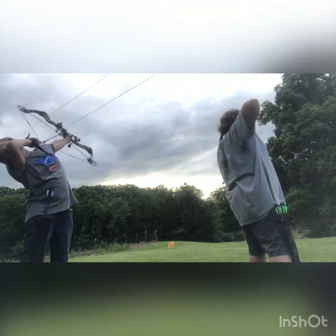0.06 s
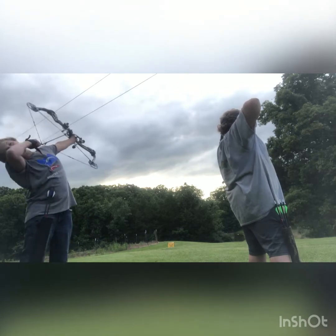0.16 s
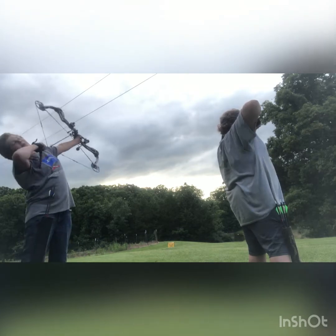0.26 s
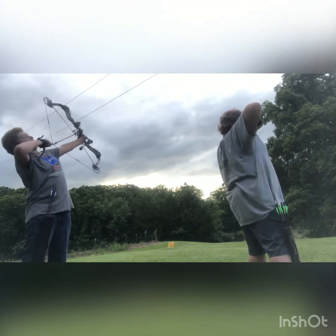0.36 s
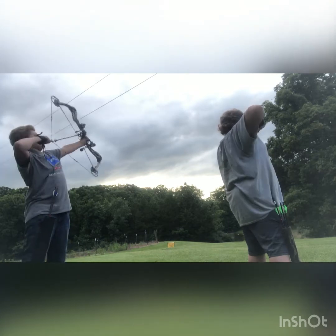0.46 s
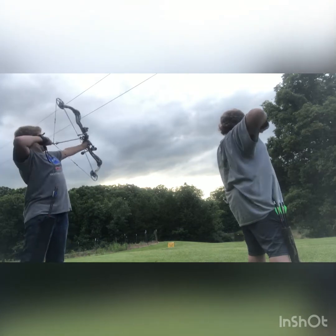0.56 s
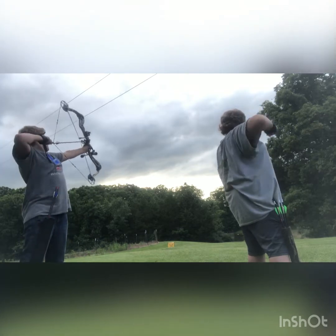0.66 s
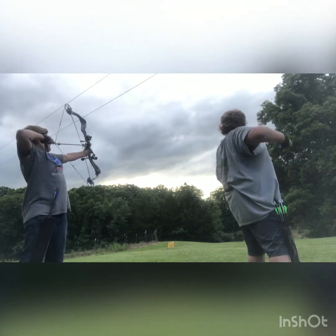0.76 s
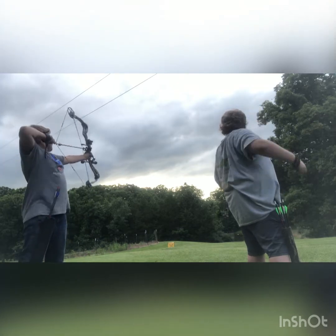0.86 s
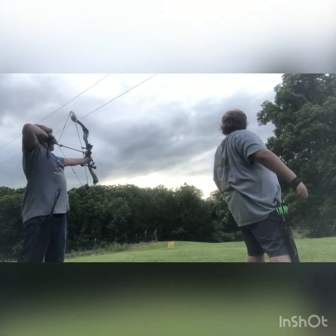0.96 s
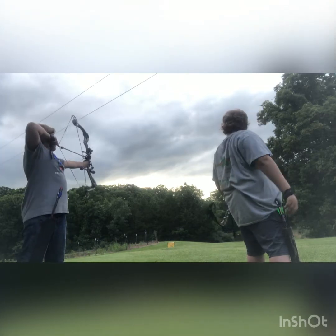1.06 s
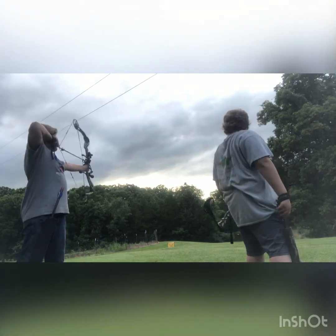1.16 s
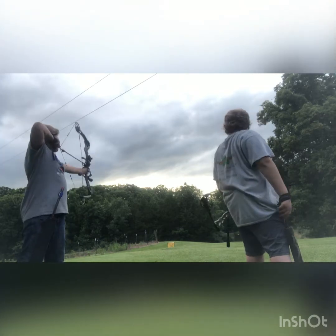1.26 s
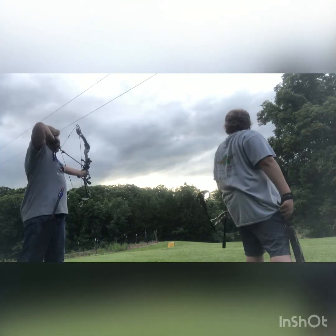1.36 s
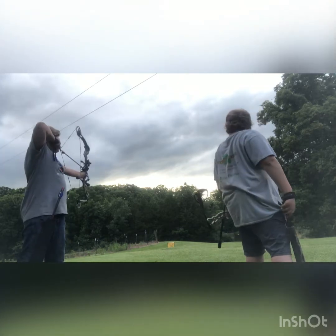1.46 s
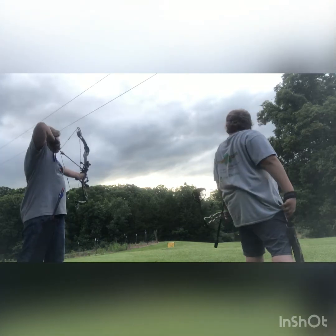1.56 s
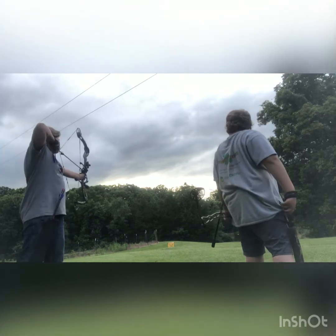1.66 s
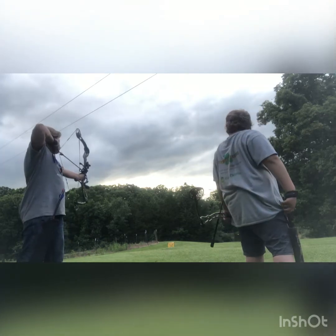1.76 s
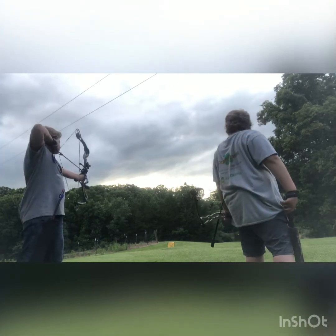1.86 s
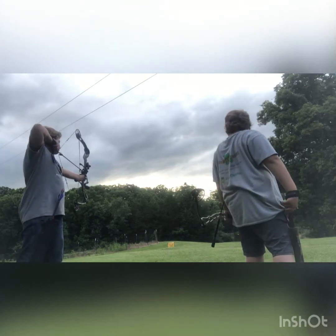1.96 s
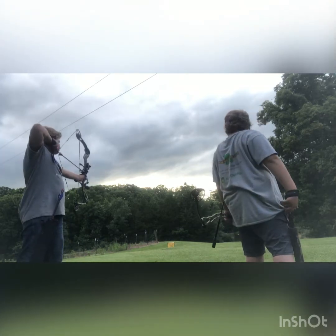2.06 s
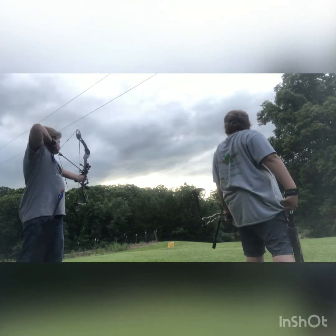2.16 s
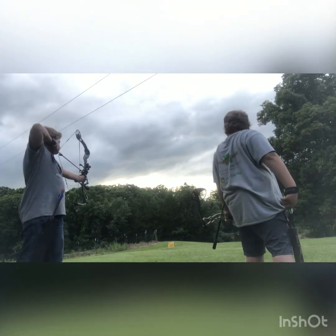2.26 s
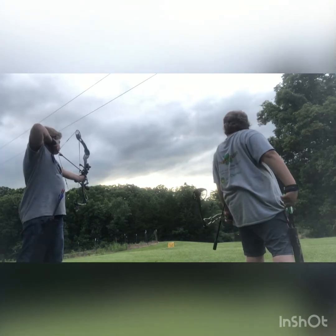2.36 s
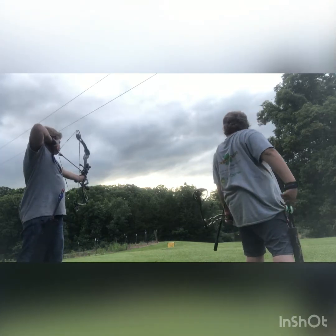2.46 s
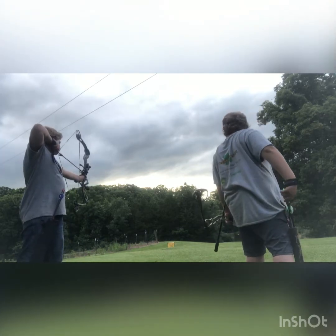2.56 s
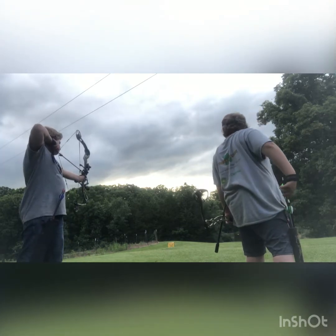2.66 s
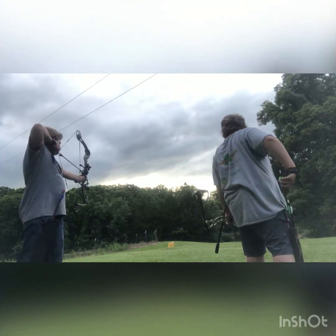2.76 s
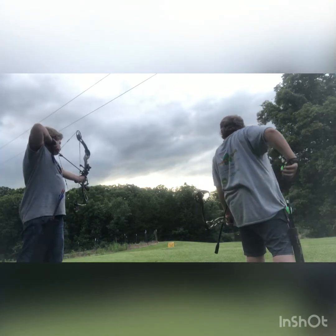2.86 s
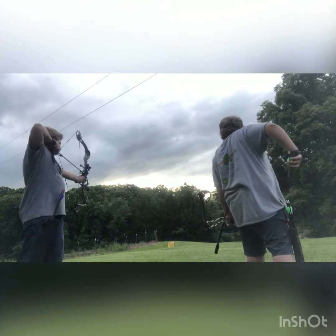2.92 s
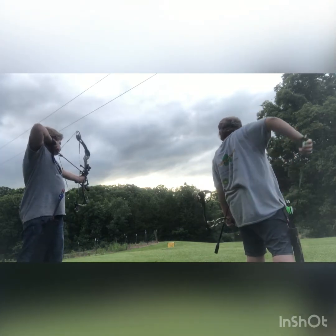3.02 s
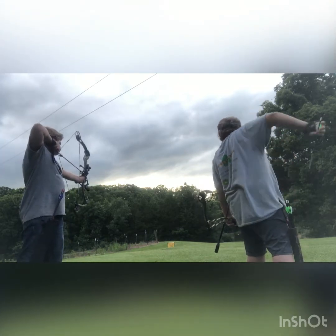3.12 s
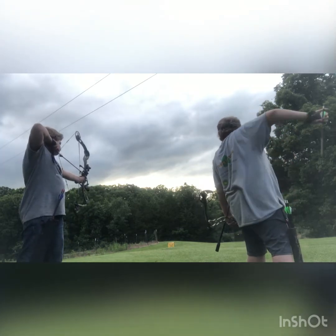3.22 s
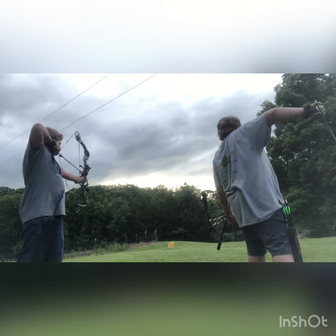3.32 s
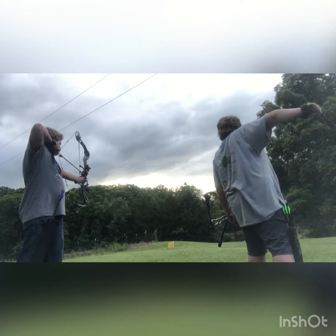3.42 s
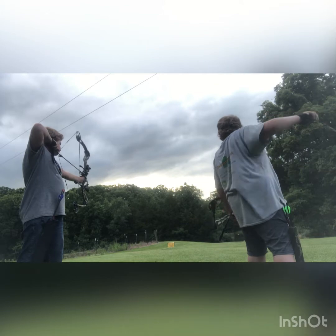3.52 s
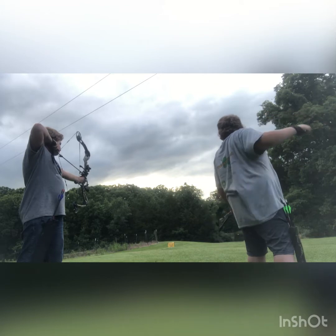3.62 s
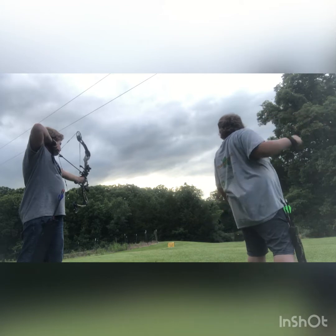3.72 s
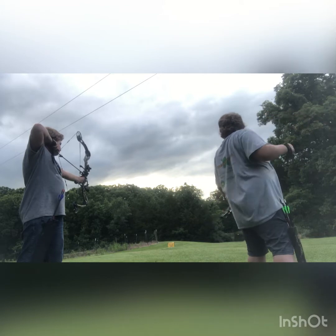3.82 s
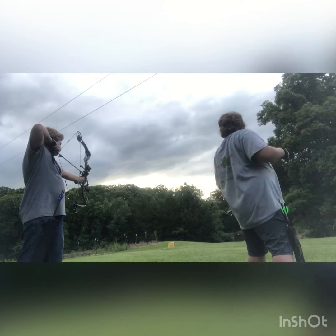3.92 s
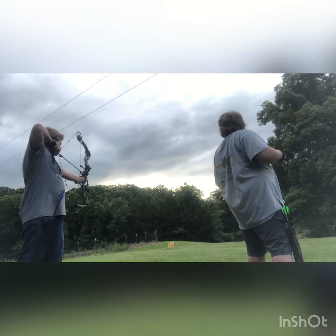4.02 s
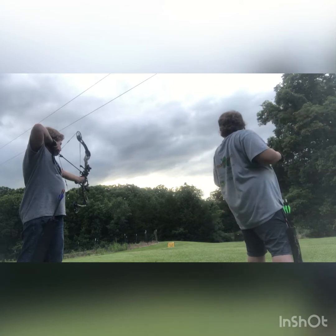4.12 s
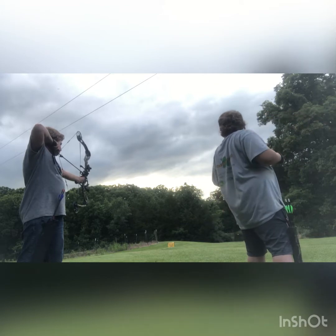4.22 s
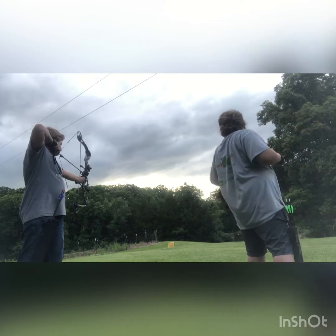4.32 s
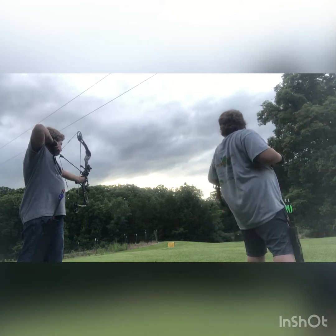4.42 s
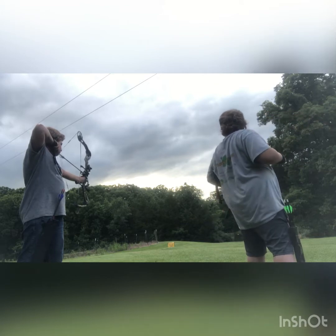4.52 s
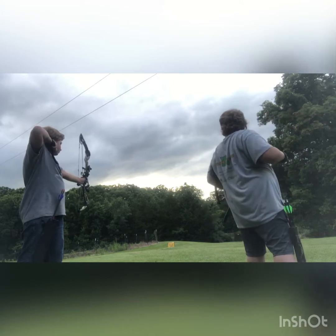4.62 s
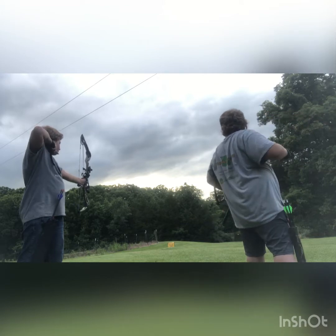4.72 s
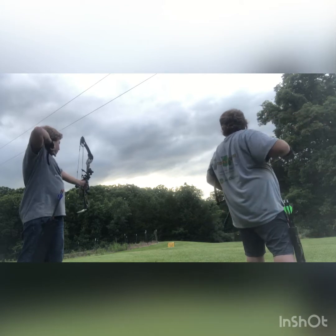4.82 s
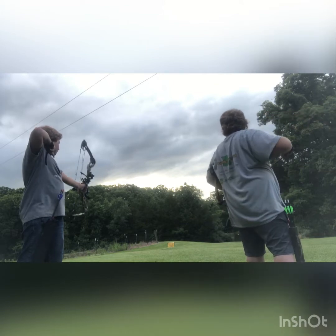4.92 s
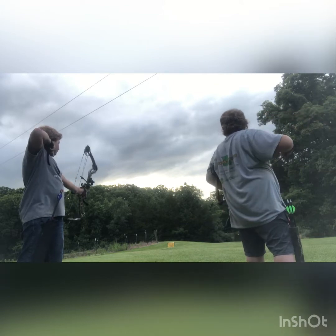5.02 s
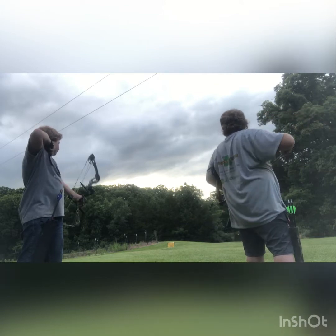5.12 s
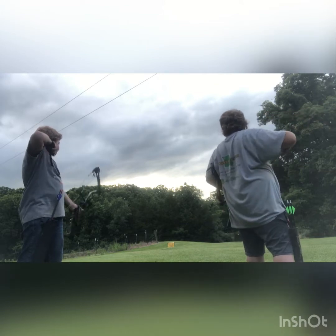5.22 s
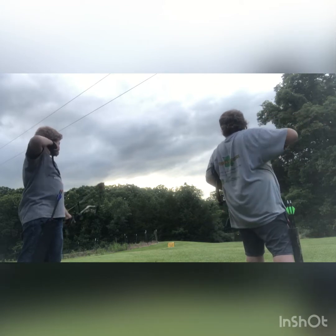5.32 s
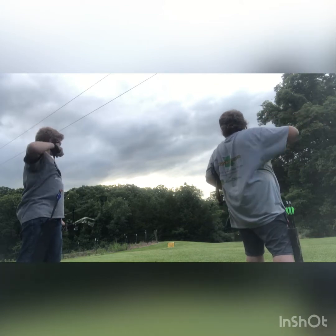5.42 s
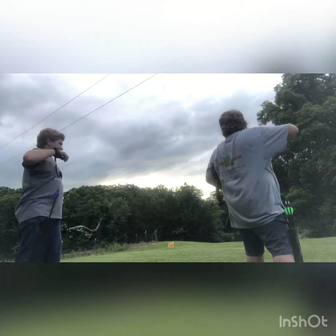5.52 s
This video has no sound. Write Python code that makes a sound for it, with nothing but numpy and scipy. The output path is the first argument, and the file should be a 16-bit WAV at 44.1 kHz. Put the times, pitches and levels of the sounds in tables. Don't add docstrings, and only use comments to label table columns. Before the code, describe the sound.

Almost at once a compound bow releases with a sharp slap and short ring, and a third of a second later its arrow cracks and thuds into a distant target. Clothes rustle, an arrow taps and slides out of a quiver, and a bird whistles faintly. Near the end a second bow snaps, with a stronger target thud. Open grassy field with tree-line echoes, low rumble and insect hiss, picked up by a phone-like microphone near the archers.

```python
import sys
import numpy as np
from scipy import signal
from scipy.fft import rfft, irfft, next_fast_len
from scipy.io import wavfile
from scipy.ndimage import uniform_filter1d, map_coordinates

SR = 44100
rng = np.random.default_rng(int(sys.argv[2]) if len(sys.argv) > 2 else 0)


def undo_db(level):
    steps = np.asarray(level, float) / 20
    return 10 ** steps


def persist_wave(psi):
    counts = np.round(np.clip(psi, -1, 1) * 32767).astype(np.int16)
    wavfile.write(sys.argv[1], SR, np.atleast_2d(counts).T)


N = 246078
T = np.arange(N) / SR

# frequency in Hz, level in dB per Hz.
CLOTH = [(400, -24), (900, -3), (2500, 2.5), (4000, -4.5), (5300, -1), (8000, -13.5), (12000, -23),
         (16000, -30)]


def unit(x):
    return x / np.sqrt(np.mean(x ** 2) + 1e-20)


def along(points, hz):
    f, v = np.transpose(points)
    return np.interp(np.log(hz + 1), np.log(f + 1), v)


def curves(rows):
    s, *cols = np.transpose(rows)
    gate = np.clip(np.minimum(T - s[0], s[-1] - T) / 0.0057, 0, 1)
    return [np.interp(T, s, c) for c in cols] + [gate]


def wobble(rate_hz):
    knots = rng.standard_normal(int(N * rate_hz / SR) + 4)
    return map_coordinates(knots, [T * rate_hz])


def filtered(x, response):
    m = next_fast_len(len(x) + 8192)
    return irfft(rfft(x, m) * response(np.fft.rfftfreq(m, 1 / SR)), m)[:len(x)]


def noise(spectrum, size=N):
    return unit(filtered(rng.standard_normal(size), lambda hz: undo_db(along(spectrum, hz))))


def patchy(x, patchy_db):
    z = signal.stft(x, nperseg=256)[2]
    patches = uniform_filter1d(rng.standard_normal(z.shape), size=5, axis=0)
    patches = uniform_filter1d(patches, size=4, axis=1)
    return unit(signal.istft(z * undo_db(patchy_db * unit(patches)), nperseg=256)[1][:len(x)])


def resonant(peaks):
    def response(f):
        total = 0
        for k, (hz, width_hz, db) in enumerate(peaks):
            damping = 1j * f * width_hz
            total = total + (-1) ** k * undo_db(db) * damping / (hz * hz - f * f + damping)
        return total
    return response


def ring(modes, t, scatter_db):
    return sum(undo_db(db + scatter_db * rng.normal() - 60 * t / t60_s) * np.sin(2 * np.pi * hz * t)
               for hz, db, t60_s in modes)


def swell(t, s, db, attack_s, hold_s, release_s):
    outside = np.maximum((s - t) / attack_s, (t - s - hold_s) / release_s)
    return undo_db(db - 20 * np.maximum(outside, 0))


def swells(t, rows):
    return np.sqrt(sum(swell(t, *row) ** 2 for row in rows))


def puff(s, db, hz, length_s, rough):
    t = np.arange(round(length_s * SR)) / SR
    grain = 1 + rough * unit(uniform_filter1d(rng.standard_normal(len(t)), size=40))
    return s - length_s / 2, undo_db(db) * np.sin(np.pi * t / length_s) ** 2 * grain * np.sin(2 * np.pi * hz * t)


def add(track, s, x):
    part = track[round(s * SR):][:len(x)]
    part += x[:len(part)]


def buzz():
    # frequency in Hz, level in dB.
    click_colour = [(1500, -112), (2500, -97), (5000, -94), (6500, -91), (7800, -93), (8400, -99),
                    (12000, -106), (16000, -114)]
    buzz_hz, on_cycle, off_cycle = 110.4336, .764, .084
    order = np.arange(14, 144)[:, None]
    cycle = np.arange(4097) / 4096
    clicks = np.cos(2 * np.pi * order * (cycle - on_cycle)) - np.cos(2 * np.pi * order * (cycle - off_cycle))
    wave = undo_db(along(click_colour, order[:, 0] * buzz_hz)) @ clicks
    return np.interp(buzz_hz * T % 1, cycle, wave)


def field():
    # time in seconds, strength in dB.
    breeze = [(0, 3), (.5, .5), (.9, 0), (1.5, 1.5), (1.75, -1), (2.6, .5), (3.2, 0), (3.5, -1.5),
              (5.58, -1.5)]
    # frequency in Hz, level in dB per Hz.
    rumble_colour = [(15, -55), (25, -30), (36, -12), (81, -1), (189, -4.5), (267, -11.5), (299, -13),
                     (406, -21), (430, -26.5), (700, -26.5), (910, -58), (1540, -120)]
    # frequency in Hz, level in dB per Hz.
    hiss_colour = [(250, -17), (450, -2), (900, -7), (2000, -11.5), (4500, -14), (5400, -12), (6000, -12.5),
                   (7800, -18.5), (8300, -20), (12000, -22), (16000, -25.5)]
    # time in seconds, level in dB, attack, hold and release in seconds.
    motor_pass = (1.2, -71.5, .6, .75, .6)
    air_db, _ = curves(breeze)
    motor_hz = 295 + 1.5 * wobble(5)
    motor = swell(T, *motor_pass) * undo_db(2.5 * wobble(8.2)) * np.sin(2 * np.pi * np.cumsum(motor_hz) / SR)
    rumble = undo_db(-61.2 + .4 * air_db + 1.4 * wobble(7)) * noise(rumble_colour)
    hiss = undo_db(-69 + air_db + .6 * wobble(5.9)) * noise(hiss_colour)
    return rumble + hiss + motor


def wind():
    # centre in seconds, peak in dB, frequency in Hz, length in seconds.
    pushes = [(0.056, -51, 62, .07), (0.431, -53, 75, .1), (.56, -58, 45, .1), (1.2, -62, 60, .08)]
    out = np.zeros(N)
    for push in pushes:
        add(out, *puff(*push, rough=0))
    return out


def bird():
    # time in seconds, pitch in Hz, level in dB.
    song = [
        [(2.095, 3855, -73), (2.133, 3815, -70), (2.18, 3765, -69), (2.225, 3760, -68), (2.245, 3705, -68),
         (2.27, 3740, -68), (2.321, 3700, -68), (2.335, 3690, -76)],
        [(2.465, 3226, -70), (2.493, 3268, -66), (2.513, 3190, -66), (2.527, 3300, -65), (2.553, 3320, -64),
         (2.585, 3260, -65)],
        [(2.665, 3263, -63), (2.697, 3379, -64), (2.757, 3393, -64), (2.765, 3348, -73)],
        [(2.92, 3245, -69), (2.94, 3240, -66), (2.968, 3310, -65), (3.0, 3290, -64), (3.009, 3273, -68)],
        [(3.006, 3000, -64), (3.012, 2650, -59), (3.017, 2900, -60), (3.022, 3400, -66), (3.032, 2850, -69)],
        [(3.103, 3276, -71), (3.125, 3320, -64), (3.165, 3500, -63), (3.23, 3610, -61), (3.255, 3530, -63),
         (3.275, 3560, -64), (3.3, 3535, -72)],
        [(3.3, 3554, -78), (3.366, 3575, -79), (3.392, 3587, -84), (3.44, 3540, -83)],
    ]
    # centre in
    # seconds, peak in dB, frequency in Hz, length in # seconds.
    chips = [(2.117, -68, 5650, .04), (2.352, -71, 3750, .025), (2.378, -72, 3270, .02),
             (2.405, -74, 3190, .03), (3.66, -73.5, 5600, .08), (3.698, -74, 5280, .06),
             (3.768, -75, 5600, .08), (2.515, -60.5, 4900, .03), (5.2365, -49, 6200, .006),
             (1.459, -56, 5250, .01), (1.1553, -44, 6400, .004), (1.64, -64, 5190, .04),
             (2.59, -58, 3500, 0.01), (2.668, -60, 3270, 0.017), (2.588, -61, 3850, 0.014),
             (2.596, -62, 3100, .016), (4.7, -56.5, 3500, .05), (5.203, -61, 5000, .015),
             (5.272, -56, 3400, .015), (5.354, -52, 3300, .009), (5.4, -61, 2390, 0.016),
             (5.432, -54.5, 3080, 0.011), (5.513, -59.5, 2770, .009)]
    out, t = np.zeros(N), np.arange(SR // 8) / SR
    waver_db, waver_hz = 1.8 * wobble(50), 18 * wobble(60)
    for note in song:
        hz, db, gate = curves(note)
        out += gate * undo_db(db + 2.5 + waver_db) * np.sin(2 * np.pi * np.cumsum(hz + waver_hz) / SR)
    for chip in chips:
        add(out, *puff(*chip, rough=0.55))
    tail = rng.standard_normal(len(t)) * undo_db(-60 * t / 0.19)
    return out + undo_db(-9) * signal.fftconvolve(out, tail / np.linalg.norm(tail))[:N]


def clothes():
    # time in seconds, level in dB, attack, hold and release in seconds.
    rubs = [(.82, -67.5, .13, .005, .14), (1.097, -59, .01, .045, .06), (1.16, -61, .04, .045, .055),
            (1.32, -70, .15, .08, .15), (1.52, -65.5, .12, .005, .18), (1.65, -69, .15, .005, .13),
            (5.23, -68, .35, .04, .4)]
    return swells(T, rubs) * undo_db(2.2 * wobble(40) + 2.9 * wobble(200)) * noise(CLOTH)


def ticks():
    # start in seconds, peak in dB, centre in Hz, treble in dB.
    tick_rows = [(.1165, -42, 5000, -20), (.1405, -24, 6800, -30), (.1562, -36, 9000, -3),
                 (.1735, -42, 7800, -8), (4.5625, -20, 6500, -8), (4.5795, -32, 10300, -10),
                 (4.9325, -50, 2700, -14), (1.0952, -42, 2500, -20), (1.1095, -42, 2100, -25),
                 (1.128, -41, 2000, -25), (1.2025, -50, 4800, -20), (1.219, -52, 3500, -10),
                 (2.33, -62, 5400, -4), (2.355, -64, 10500, -10), (2.387, -63, 6000, -4),
                 (0.9877, -54, 3980, -16), (1.0965, -29.5, 5340, -8), (1.1032, -36, 2400, -16),
                 (1.1139, -27.5, 6120, -16), (1.1232, -33.5, 3330, -18), (1.1337, -33, 3030, -24),
                 (1.1538, -41, 4500, -11), (1.1787, -25.5, 5000, -15), (1.1854, -46, 4840, -19),
                 (1.2115, -48, 2210, -18), (1.2286, -48, 2460, -22), (1.3362, -42, 2940, -25),
                 (1.457, -48, 5160, -28), (1.554, -38.5, 3200, -28), (1.6474, -55, 5110, -17),
                 (1.8343, -42, 3500, -22), (1.911, -40, 4960, -24), (1.9814, -54, 2360, -26),
                 (2.584, -51, 3420, -40), (2.823, -50, 3030, -25), (3.0106, -59, 2790, -27),
                 (1.0985, -36, 8300, -30), (1.2125, -52, 6000, -14), (2.707, -52, 2450, -25),
                 (2.76, -58, 8500, -10), (3.0864, -50, 1620, -21), (3.4191, -59, 3540, -8),
                 (3.469, -52, 3200, -2), (4.9957, -38.5, 1810, -22), (5.1379, -52, 2240, -24),
                 (5.2344, -41.5, 2600, -10), (5.3043, -47, 2200, -26), (5.43, -50, 2900, -20),
                 (2.372, -58, 2000, -30)]
    out, t = np.zeros(N), np.arange(SR // 8) / SR
    for s, db, hz, treble_db in tick_rows:
        t60_s = .024 + .0033 * hz / 1000
        width_hz = max(.8 + .015 * treble_db, .03) * hz
        peaks = resonant([(hz, width_hz, 0), (9500, 3500, treble_db + 1), (1800, 1200, -9)])
        colour = lambda f: peaks(f) / (1 + 1j * f / 11000) ** 2
        decay = undo_db(-60 * t / t60_s) + 1.4 * undo_db(-60 * t / 0.0068)
        burst = (1 - np.exp(-t / 0.00036)) * rng.standard_normal(len(t)) * decay
        add(out, s, undo_db(db - 5.5) * filtered(burst, colour) * np.sqrt(8000 / width_hz))
    return out


def shaft_taps():
    # start in seconds, then peak, low, bright and tube levels in dB.
    taps = [
        (2.147, -25.5, -0.5, -8, -5),
        (2.189, -33, 1.5, -9, -5.5),
        (2.217, -36.5, 2, -14, -8),
        (2.234, -42, 2, -14, -10),
    ]
    # frequency in Hz, level in dB, t60 in seconds.
    shaft_modes = [(620, -14, .03), (890, -7, 0.045), (1100, -8, 0.04), (1257, -4, 0.045), (1480, 8, .014),
                   (1620, 1, 0.032), (2020, -16, .03), (2300, -5, .016), (3150, -5, 0.014), (4000, -8, .01),
                   (4590, 0, 0.016), (6400, -5, .01), (8040, -19, 0.023)]
    # frequency in Hz, level in dB, t60 in seconds.
    tube_modes = [(174, -1, 0.58), (420, -6, 0.047)]
    # frequency in Hz, level in dB per Hz.
    dull_colour = [(500, -30), (800, 4), (1700, 6.5), (2600, -39)]
    shaft_lag_s = .0012
    out, t = np.zeros(N), np.arange(SR // 2) / SR
    for s, db, low_db, bright_db, tube_db in taps:
        modes = [(hz, level_db + bright_db * (hz > 2600) + low_db * (hz < 1400), t60_s)
                 for hz, level_db, t60_s in shaft_modes]
        bright = undo_db(bright_db + 1) * noise(CLOTH, size=len(t))
        dull = undo_db(low_db - 8) * noise(dull_colour, size=len(t))
        shaft = (1 - np.exp(-t / .001)) * ring(modes, t, scatter_db=1.5)
        tube = undo_db(tube_db - 8) * ring(tube_modes, t, scatter_db=0)
        add(out, s, undo_db(db - 9) * undo_db(-60 * t / 0.02) * (bright + dull))
        add(out, s + shaft_lag_s, undo_db(db - 9) * (shaft + tube))
    return out


def snaps():
    # start in seconds, level in dB, t60 in seconds.
    clicks = [
        (3.0674, -38.5, .012),
        (3.0718, -41, .022),
        (3.087, -60, .03),
        (.1562, -37, .008),
    ]
    # frequency in Hz, level in dB per Hz.
    snap_colour = [(900, -30), (2000, -8), (5500, 0), (9000, -7), (14000, -10), (16000, -18)]
    out, t = np.zeros(N), np.arange(SR // 2) / SR
    for s, db, t60_s in clicks:
        add(out, s, undo_db(db - 60 * t / t60_s) * noise(snap_colour, size=len(t)))
    return out


def nock_raps():
    # start in seconds, level in dB.
    groups = [
        [(2.4492, -35.5), (2.4585, -52)],
        [(3.0675, -55), (3.0718, -44.5), (3.0745, -48), (3.087, -60)],
    ]
    # frequency in Hz, level in dB, t60 in seconds.
    nock_modes = [
        [(829, -15, .05), (1250, -16, .04), (1650, -3, .045), (1760, -5, .035), (1900, -2, .014),
         (2090, -8, .025), (2390, -4, .03), (3160, -9, .025), (3950, -12, .015), (4640, -4, .02),
         (5240, -10, .025), (6180, -20, .05), (7950, -18, .04)],
        [(1135, -10, .065), (1620, -8, .07), (1767, -9, .04), (2280, -7, .04), (2885, -7, .05), (3560, -5, .04),
         (3790, -8, .03), (4250, -9, .025), (4800, -1, .025), (5050, -8, .05), (5570, 0, .02), (6480, 0, .018),
         (7950, -14, .06), (8430, -6, .015)],
    ]
    out, t = np.zeros(N), np.arange(SR // 2) / SR
    for raps, modes in zip(groups, nock_modes):
        for s, db in raps:
            body = (1 - np.exp(-t / .0002)) * ring(modes, t, scatter_db=1.5)
            spray = .4 * undo_db(-60 * t / .02) * noise(CLOTH, size=len(t))
            add(out, s, undo_db(db) * (body + spray))
    return out


def slide():
    # time in seconds, level in dB.
    pull_rows = [(2.49, -80), (2.51, -67), (2.63, -68), (2.71, -59.5), (2.745, -56), (2.77, -61),
                 (2.86, -64.5), (2.91, -59), (2.95, -64)]
    # time in seconds, level in dB, attack, hold and release in seconds.
    catches = [(2.335, -71, .03, .005, .08), (2.51, -68, .025, .005, .12), (2.875, -70, .02, .02, .02),
               (2.895, -61, .012, .047, .01)]
    # frequency in Hz, width in Hz, level in dB.
    body = [(935, 270, -8), (1300, 300, -6), (1644, 110, 6), (2064, 410, -5), (2410, 130, 1),
            (3200, 900, -2.5)]
    scrape = [(4650, 320, 10.5), (6200, 900, -11)]
    fizz = [(8900, 600, 2), (10500, 1200, -4), (12500, 2000, -12)]
    vanes = [(5050, 450, 9), (6300, 900, -8), (8800, 900, -5), (12500, 2500, -12)]
    pull_db, gate = curves(pull_rows)
    pull, catch = gate * undo_db(pull_db), swells(T, catches)
    out = np.zeros(N)
    for gain, peaks in [(pull + .4 * catch, body), (undo_db(-4) * pull, scrape), (undo_db(-13) * pull, fizz), (catch, vanes)]:
        grip_db = 1.2 * wobble(18) + 1.1 * wobble(45) + 1.9 * wobble(150)
        grit = undo_db(grip_db) * rng.standard_normal(N)
        out += gain * patchy(filtered(grit, resonant(peaks)), patchy_db=1.8)
    return out


def trees(s, db, colour, answer):
    clumps = patchy(noise(colour), patchy_db=1.6)
    tail = clumps * swells(T - s, answer) * undo_db(db + 1.3 * wobble(250) + .6 * wobble(70))
    dull = filtered(tail, lambda hz: 1 / (1 + (hz / 5000) ** 2))
    return dull + (tail - dull) * undo_db(-40 * np.clip(T - s - .06, 0, 1))


def echoes():
    # time in seconds, level in dB.
    events = [
        (0.1375, -52),
        (4.565, -51.5),
        (.4936, -45),
        (4.9176, -40.5),
    ]
    # frequency in Hz, level in dB per Hz.
    after_bow = [
        [(410, -36), (700, -8), (1250, -10), (3460, -1.5), (5190, -3.5), (12300, -17.5), (16000, -25)],
        [(600, -24), (1000, -8), (2000, -8), (3550, 0), (5000, -5.5), (8000, -10.5), (11000, -15.5), (16000, -21)],
    ]
    after_strike = [
        [(59, -33), (100, -7), (295, -0.5), (676, -16.5), (801, -5), (1130, -9), (1310, -5.5), (2220, -13), (4770, -6.5), (6500, -22), (16000, -51)],
        [(59, -38), (100, -12), (185, 0), (373, -4), (595, -16), (1280, -12.5), (2470, -10.5), (5420, -29.5), (7940, -36.5), (16000, -54)],
    ]
    # delay in seconds, level in dB, attack, hold and release in seconds.
    behind_bow = [
        (.001, 18, .001, .001, .03),
        (.02, -1, .002, .01, .2),
        (.118, -6.5, .045, .01, .18),
        (.15, -16, .05, .01, .55),
    ]
    behind_target = [
        (.002, -25, .002, .03, .05),
        (.037, .5, .009, .025, .115),
        (.09, -15, .02, .01, .7),
    ]
    colours = [*after_bow, *after_strike]
    answers = [behind_bow] * 2 + [behind_target] * 2
    return sum(trees(s, db, colour, answer) for (s, db), colour, answer in zip(events, colours, answers))


def target():
    # time in seconds, crack in dB, thud in dB, thud in Hz, rebound in Hz.
    strikes = [
        (.4936, -14, -16.1, 501, 215),
        (4.9176, -12.5, -5.7, 519, 204),
    ]
    # frequency in Hz, level in dB, t60 in seconds.
    crack_modes = [
        [(1400, -19, .003), (2500, -25, .002), (4150, -5.5, .0013), (5700, -21, .0012), (8200, -21, .0012),
         (12400, -28, .001)],
        [(850, -16, .008), (1450, -9.5, .004), (2900, -12, .002), (5500, -15, .0012), (8000, -30, .001),
         (10800, -21, .001)],
    ]
    # delay in seconds, build-up in seconds, ground copy share.
    jumps = [
        (.00048, .00036, -.25),
        (.00031, .00025, .08),
    ]
    # frequency in Hz, level in dB, t60 in seconds.
    bale_modes = [(150, -34, .1), (235, -30, .1), (370, -29, .1), (480, -33, .08)]
    ground_s, swell_s, rebound_s = .00124, .0006, .0067
    out, t = np.zeros(N), np.arange(SR // 8) / SR
    for (s, crack_db, thud_db, thud_hz, low_hz), modes, (delay_s, build_s, ground) in zip(strikes, crack_modes, jumps):
        v = t - 44 / SR
        steady = [(hz, db, 1) for hz, db, _ in modes]
        lead = np.exp(-(v / build_s) ** 2) * ring(steady, v, scatter_db=0)
        crack = np.where(v < 0, lead, ring(modes, abs(v), scatter_db=0))
        spray = 0.09 * (v > 0) * undo_db(-60 * t / 0.012) * noise(CLOTH, size=len(t))
        crack_s = s + delay_s - .001
        add(out, crack_s, undo_db(crack_db + 6) * (crack + spray))
        add(out, crack_s + ground_s, undo_db(crack_db + 6) * ground * crack)

        bale = (1 - np.exp(-t / .003)) * ring(bale_modes, t, scatter_db=2)
        add(out, s + 2 * rebound_s, undo_db(thud_db) * bale)
        u = t / swell_s / 5
        thud = (u * np.exp(1 - u)) ** 4 * np.sin(2 * np.pi * thud_hz * t * (1 - 40 * t))
        add(out, s + .0009, undo_db(thud_db) * thud)
        rebound = (1 - np.exp(-t / .0007)) * ring([(low_hz, -5.3, .022)], t, scatter_db=0)
        add(out, s + rebound_s, undo_db(thud_db) * rebound)
    return filtered(out, lambda f: f ** 4 / (f ** 4 + 95 ** 4))


def whips():
    # start in seconds, length in seconds, from Hz, to Hz, level in dB.
    zips = [
        (.133, .007, 1800, 5000, -46),
        (4.5565, .006, 900, 3200, -40),
    ]
    out = np.zeros(N)
    for s, length_s, from_hz, to_hz, db in zips:
        u = np.arange(round(length_s * SR)) / (length_s * SR)
        rough = 1 + .4 * unit(uniform_filter1d(rng.standard_normal(len(u)), size=20))
        tone = np.sin(2 * np.pi * np.cumsum(from_hz + (to_hz - from_hz) * u) / SR)
        add(out, s, undo_db(db) * np.sin(np.pi * u ** 1.5) * rough * tone)
    return out


def risers():
    # start in seconds, level in dB, frequency in Hz, t60 in seconds, build-up in seconds.
    tones = [
        (.1425, -26.5, 473, .2, .018),
        (.15, -36, 65, .11, .012),
        (4.5675, -29.5, 775, .155, .004),
        (4.567, -40, 110, .07, .006),
    ]
    out, t = np.zeros(N), np.arange(SR // 2) / SR
    for s, db, hz, t60_s, build_s in tones:
        add(out, s, (1 - np.exp(-t / build_s)) * ring([(hz, db, t60_s)], t, scatter_db=0))
    return out * undo_db(1.2 * wobble(60))


def bow(contacts, slap, limbs, ring_db):
    build_cycles, lead_s = 1.2, .02
    out, t = np.zeros(N), np.arange(SR // 2) / SR
    for s, db, rise_s, t60_s, strike_db in contacts:
        u = t - lead_s
        shape = np.where(u < 0, 0.26 * np.exp(np.minimum(u, 0) / rise_s), undo_db(-60 * u / t60_s))
        add(out, s - lead_s, undo_db(db - 8) * shape * noise(slap, size=len(t)))
        for mode in limbs:
            swing_up = 1 - np.exp(-t * mode[0] / build_cycles)
            add(out, s, undo_db(ring_db + strike_db) * swing_up * ring([mode], t, scatter_db=1.5))
    return out


def releases():
    # time in seconds, peak in dB, lead-in in seconds, t60 in seconds, ring in dB.
    contacts_a = [
        (.1193, -27, 0.0025, 0.018, -40),
        (.1403, -12, 0.002, .02, -1),
        (.1445, -26, .001, .05, -9),
        (.1565, -30, .001, 0.045, -8),
        (.1735, -36, .001, 0.03, -17),
    ]
    contacts_b = [
        (4.5405, -39, .001, 0.082, -42),
        (4.5624, -13, 0.0012, 0.025, -16),
        (4.5645, -15, .001, .028, -12),
        (4.5665, -13, 0.0011, 0.025, 4.5),
        (4.569, -15, 0.0013, 0.024, -10),
        (4.5795, -28, .001, 0.022, -22),
    ]
    # frequency in Hz, level in dB per Hz.
    slap_a = [(240, -30), (400, -18), (666, -12), (964, -21), (1650, -8.5), (2550, -14), (3810, -11),
              (6050, -18.5), (6850, -14), (7630, -22), (12700, -25.5), (16000, -37)]
    slap_b = [(240, -43), (400, -26), (697, -12), (1130, -30), (1330, -18), (1460, -22), (2090, -10),
              (2800, -15.5), (3070, -8), (4500, -19), (6800, -17), (10700, -14), (16000, -30)]
    # frequency in Hz, level in dB, t60 in seconds.
    limbs_a = [(200, 2, 0.06), (397, -10, .05), (520, 1, .08), (590, 1, 0.06), (645, 9, 0.04),
               (725, -5, 0.045), (810, -9, .08), (875, -11, .07), (1050, -14, .05), (1280, -9, 0.06),
               (2000, -10, .04), (3500, -5, 0.022), (6850, -4, .012)]
    limbs_b = [(240, -22, .08), (422, -10, 0.085), (570, -4, .028), (678, 12, 0.03), (810, -6, 0.04),
               (926, -10, 0.075), (991, -17, .08), (1324, -20, .09), (2113, 0, 0.03), (3060, 9, 0.023),
               (3520, -5, 0.025), (6830, -23, .08), (10550, -5, .025)]
    return bow(contacts_a, slap_a, limbs_a, ring_db=-29.5) + bow(contacts_b, slap_b, limbs_b, ring_db=-24.5)


def scene():
    background = buzz() + field() + wind() + bird()
    quiver = clothes() + ticks() + shaft_taps() + snaps() + nock_raps() + slide()
    shots = echoes() + target() + whips() + risers() + releases()
    return (background + quiver + shots)[None]


def low_pass(x):
    return signal.sosfilt(signal.butter(12, 16660, fs=SR, output="sos"), x)


def record(dry):
    mic = lambda hz: (1j * hz / (32 + 1j * hz)) ** 2 / (1 + (hz / 16000) ** 60)
    return low_pass(filtered(dry[0], mic)[None])


dry = scene()
out = record(dry)
persist_wave(out)
```